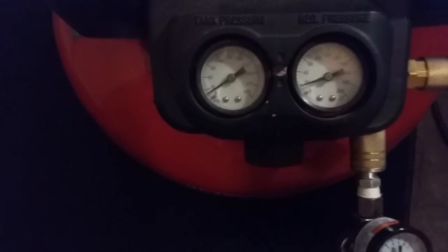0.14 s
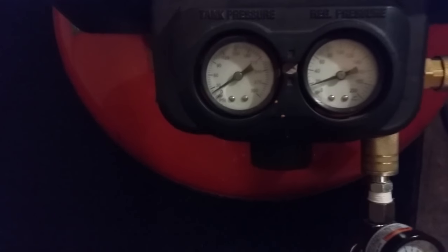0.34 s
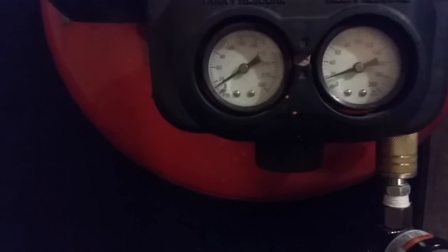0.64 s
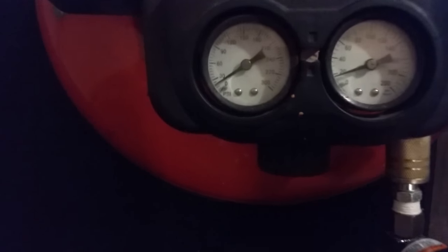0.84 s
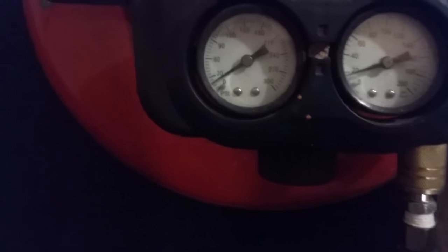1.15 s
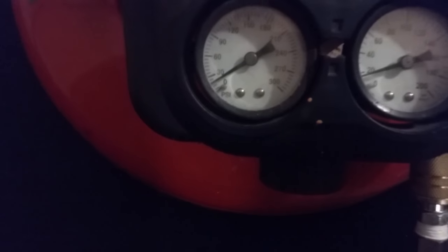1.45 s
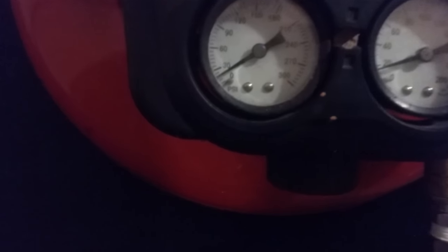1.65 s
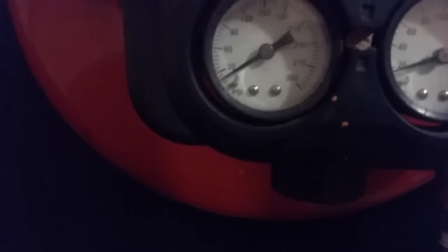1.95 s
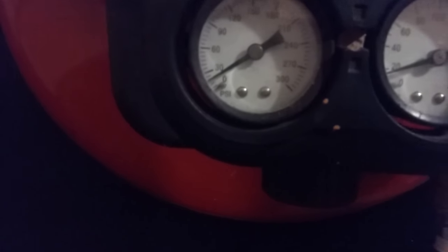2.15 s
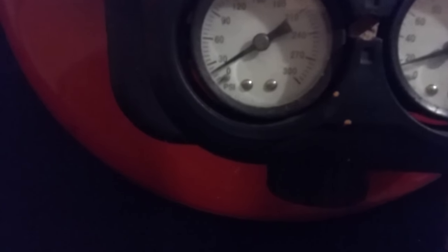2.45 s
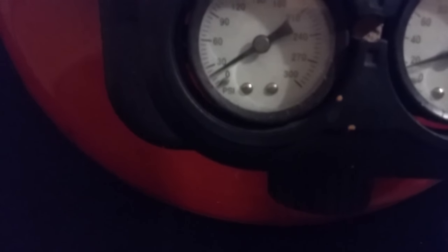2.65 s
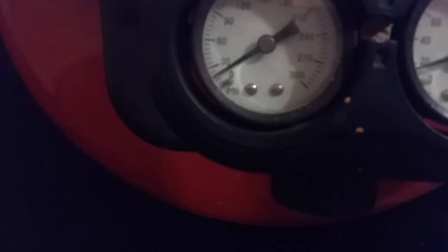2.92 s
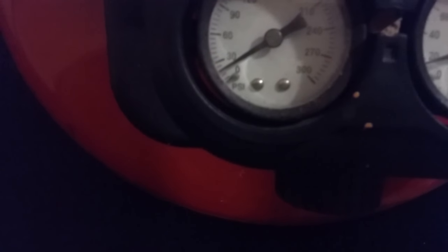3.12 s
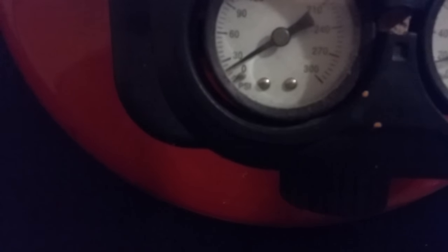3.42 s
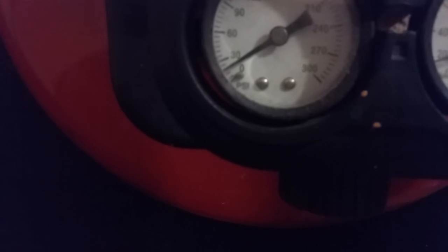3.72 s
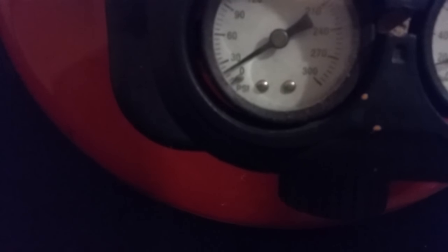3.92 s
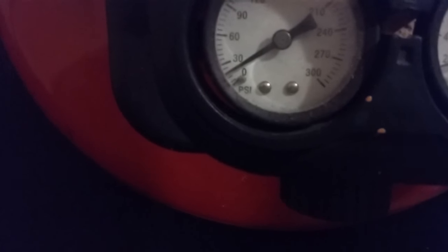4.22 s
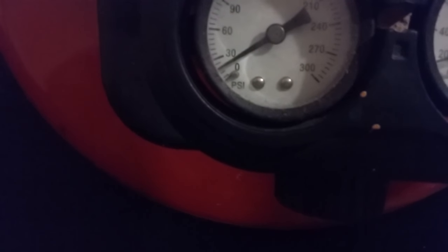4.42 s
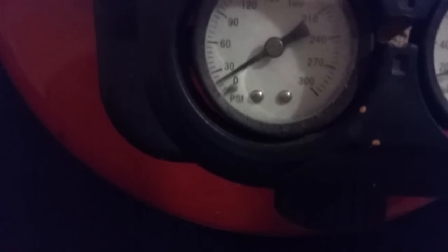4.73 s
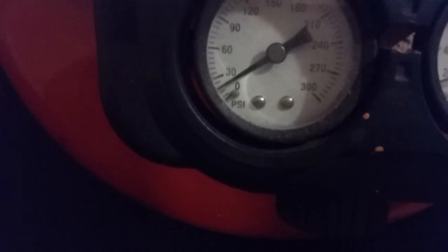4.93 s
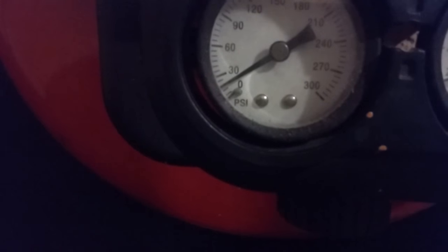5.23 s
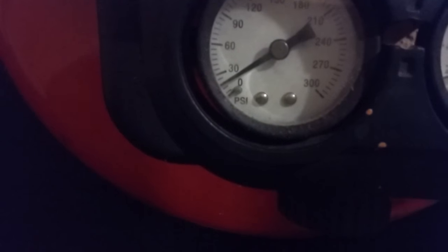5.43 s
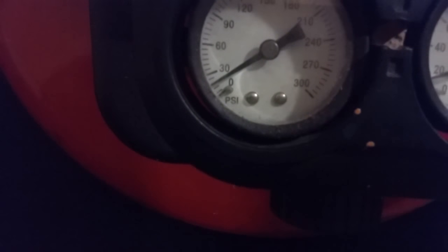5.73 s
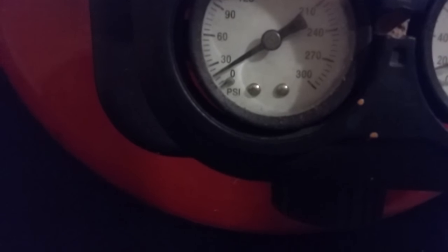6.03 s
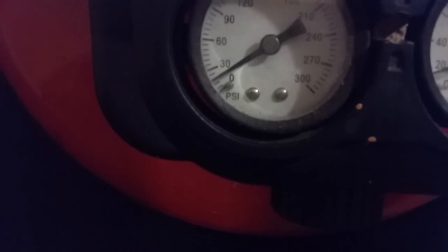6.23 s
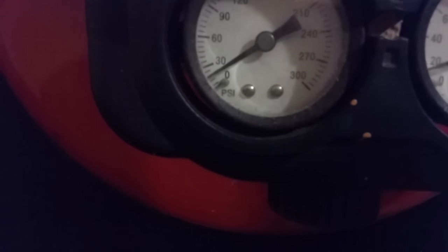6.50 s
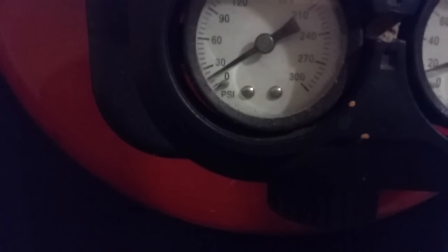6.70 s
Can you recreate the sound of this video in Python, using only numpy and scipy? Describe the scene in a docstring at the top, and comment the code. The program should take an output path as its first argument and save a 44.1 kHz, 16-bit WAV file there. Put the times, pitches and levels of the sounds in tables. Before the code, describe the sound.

Rapid puffs of compressed air hiss from a little engine, with dull knocks and faint squeaks in a small room.

```python
"""Little compressed-air engine

A single cylinder turns about six and a half times a second in a small room. On each turn the exhaust
port opens with a chirp and lets out a hissing puff; then the play in the linkage knocks the bench, and
the moving parts rub. The engine rocks in slow swells, which lift the knocks most and the puffs a little;
now and then the sliding parts run dry and squeak."""
import sys
import numpy as np
from scipy import signal
from scipy.fft import rfft, irfft, next_fast_len
from scipy.io import wavfile

SR = 44100
rng = np.random.default_rng(int(sys.argv[2]) if len(sys.argv) > 2 else 0)


def materialize(psi):
    """Save the field psi as 16-bit PCM at rate SR to the path in sys.argv[1].

    A 1-D psi becomes a single channel; in a 2-D psi each row is a channel.
    """
    bounded = np.clip(np.atleast_2d(psi).T, -1, 1)
    quanta = np.round(bounded * 32767).astype(np.int16)
    wavfile.write(sys.argv[1], SR, quanta)


N = 302692
TIME = np.arange(N) / SR

# how strongly the port sings near 6 kHz; the chirp follows it in part: t/s, level/dB over the jet
PORT_SINGING = [(0, 1), (.75, 3), (1.7, -2.5), (2.5, -15), (3.2, -3), (4, -13), (5, -11), (6.3, -24)]


def from_db(db):
    """Decibels to gain."""
    return 10 ** (np.asarray(db) / 20)


def rms_one(x):
    """Scale to unit power."""
    return x / np.sqrt(np.mean(x ** 2) + 1e-20)


def curve(rows, at):
    """Read a table of t/s, value at the given times."""
    return np.interp(at, *np.transpose(rows))


def lowpass(x, hz):
    """Soften with a two-pole low-pass."""
    return signal.sosfilt(signal.butter(2, hz, fs=SR, output="sos"), x)


def noise(spectrum):
    """Noise coloured by a table of f/Hz, level/dB; rms 1."""
    hz, db = np.transpose(spectrum)
    size = next_fast_len(N)
    bins = np.maximum(np.fft.rfftfreq(size, 1 / SR), 1)
    gain = from_db(np.interp(np.log(bins), np.log(hz), db))
    return rms_one(irfft(rfft(rng.standard_normal(size)) * gain)[:N])


def flutter(hz):
    """Smooth random wobble up to about the given rate; rms 1."""
    return rms_one(lowpass(rng.standard_normal(N), hz))


def whistle(hz, width):
    """A steady tone whose wandering phase smears it over a width in Hz; rms 1."""
    drift = signal.lfilter([.02], [1, -.98], rng.standard_normal(N))
    wander = np.sqrt(2 * np.pi * width / SR) * drift
    return np.sqrt(2) * np.sin(np.cumsum(2 * np.pi * hz / SR + wander))


def resonance(x, hz, width):
    """Two-pole band-pass with gain 1 at its peak."""
    r, w = np.exp(-np.pi * width / SR), 2 * np.pi * hz / SR
    return signal.lfilter(np.array([1, 0, -1]) * (1 - r * r) / 2, [1, -2 * r * np.cos(w), r * r], x)


def ring(force, hz, t60):
    """One struck mode: a unit click starts a dying sine of height 1."""
    r, w = np.exp(-np.log(1000) / (t60 * SR)), 2 * np.pi * hz / SR
    return signal.lfilter([0, np.sin(w)], [1, -2 * r * np.cos(w), r * r], force + 1e-18)


def clicks(times, force):
    """One click of the given force at each time."""
    at = np.round(times * SR).astype(int)
    inside = (at >= 0) & (at < N)
    return np.bincount(at[inside], force[inside], N)


def every_turn(starts, levels_db, shape):
    """Repeat an envelope (t/s after the port opens, level/dB) on each turn, at that turn's level."""
    lag, db = np.transpose(shape)
    power = np.zeros(N)
    for start, level in zip(starts, levels_db):
        a, b = np.searchsorted(TIME, [start + lag[0], start + lag[-1]])
        power[a:b] += from_db(level + np.interp(TIME[a:b] - start, lag, db)) ** 2
    return np.sqrt(power)


def turn_starts(first_s=-.0525):
    """The times at which the port opens, once a turn."""
    # the engine slows as the air pressure sinks: t/s, turn rate/Hz
    speed = [(0, 6.4785), (2.8, 6.4287), (4, 6.3384), (5.4, 6.306), (6.1, 6.163), (6.9, 6.356)]
    starts = [first_s]
    while starts[-1] < TIME[-1]:
        starts.append(starts[-1] + 1 / curve(speed, starts[-1]))
    return np.array(starts)


def swell(at, lull_db=-11):
    """The rocking rises and falls in an arch from lull to lull; in dB, 0 at the crest."""
    # lulls in the rocking: t/s
    lulls = [-.08, 1.66, 3.1, 4.6, 6.06, 7.7]
    arch = np.sin(np.pi * np.interp(at, lulls, np.arange(len(lulls)))) ** 2
    return 10 * np.log10(arch + (1 - arch) * from_db(lull_db) ** 2)


def chirps(starts, chirp_db):
    """The narrow slit whistles for a few milliseconds, and once more as the port widens."""
    # edge tones of the barely open port: f/Hz, width/Hz, level/dB
    edge_tones = [(5896, 71.3, 5), (5970, 570, -1), (11300, 560, -10), (12800, 120, -11)]
    double_blip = [(-.001, -22), (.0015, 1), (.005, -5), (.009, -5),
                   (.012, -8), (.0155, 5), (.02, -13), (.045, -40)]
    tone = rms_one(sum(from_db(db) * whistle(hz, width) for hz, width, db in edge_tones))
    return tone * every_turn(starts, chirp_db, double_blip)


def jet_noise(speed, fizz_db=2.5, edge_db=-2, spit_db=2, shimmer_db=3):
    """Turbulence coloured by the exhaust passage; the fastest flow (speed 1) is the brightest; rms 1."""
    # colour of the jet: f/Hz, level/dB
    colour = [(150, -9.5), (500, -13), (1000, -13.5), (1500, -9.5), (2400, -9.5), (3500, -12.5), (4700, -7),
              (5900, -1), (7600, -1.5), (9500, -6.5), (11200, -7), (13500, -9), (16000, -10.5)]
    # narrow resonances of the passage: f/Hz, width/Hz, level/dB over the jet
    passage = [(4600, 60, -6), (5730, 22, -8), (7170, 78, -5.5), (7450, 35, -0.5), (7900, 15, 1),
               (8030, 23, -8), (8530, 34, 4), (10900, 30, -8.5), (12800, 35, -7)]
    hiss = noise(colour)
    # each puff excites the resonances in a different mix
    shimmer = sum(from_db(db + shimmer_db * flutter(10)) * resonance(hiss, hz, width)
                  for hz, width, db in passage)
    swirl = noise(colour)
    singing = from_db(curve(PORT_SINGING, TIME)) * resonance(swirl, hz=6050, width=560)
    body_db = -12.5 + 2.5 * TIME   # the jet gains body as the listener moves
    body = from_db(body_db) * resonance(swirl, hz=3369, width=730)
    fizz = from_db(fizz_db + spit_db * flutter(20)) * resonance(noise(colour), hz=12000, width=4200)
    edge = from_db(edge_db + spit_db * flutter(3.01)) * resonance(swirl, hz=7700, width=470)
    return rms_one(hiss + shimmer + singing + body + speed * (fizz + edge))


def exhaust(starts, puff_db, leak_db, turbulence_db=0.5):
    """One hissing puff on each turn; between puffs a little air leaks past the closed port."""
    # air flow through the port: t/s after it opens, level/dB
    port_flow = [(-.03, -56), (-.012, -20), (-.002, -11.5), (.002, -4), (0.013, 2), (0.024, 3.5), (.036, 3),
                 (.055, -4), (.08, -10.5), (.1, -15.5), (.12, -51)]
    seepage = [(.05, 6), (.08, 6), (.105, 2.5), (.125, -0.5), (.14, 2), (.152, 0), (.165, -18)]
    flow = every_turn(starts, puff_db, port_flow)
    leak = every_turn(starts, leak_db, seepage)
    jet = jet_noise(speed=flow / flow.max())
    return jet * np.hypot(flow, leak) * from_db(turbulence_db * flutter(460))


def knocks(starts, knock_db, blow_db=-4, rattle_db=-7, shudder_db=-9.3, scatter_db=1, scatter_s=.00037):
    """Soft contacts of the linkage and their fine rattle ring the bench, which shudders on after them."""
    # contacts of the loose linkage: t/s after the port opens, level/dB
    contacts = [(.053, -4.5), (0.057, -2.5), (0.072, -3), (.081, -2.5), (0.0873, -7.5), (.1, -2)]
    # modes of the bench and engine frame: f/Hz, level/dB, t60/s
    bench_modes = [(75.3, -15, 0.26), (118, 0.5, 0.12), (188.9, -2.8, 0.18), (222.5, -6, 0.11),
                   (277.8, -5.5, .17), (354, -5.5, 0.074), (369.6, -7.5, 0.12), (409, -21.5, 0.078),
                   (478.6, -11.5, 0.076), (770, -10, 0.045)]
    # colour of the dull shudder: f/Hz, level/dB
    shudder_colour = [(25, -45), (42, -20), (64, 8), (90, -4.5), (125, -4), (165, -10.5), (260, -12.5),
                      (450, -24), (900, -20), (2000, -33)]
    rattle_colour = [(60, 4), (130, -10), (200, 1.5), (900, -1.5), (3000, -32), (9000, -50)]
    rattle_shape = [(.047, -57), (.052, -37), (.075, -38.5), (.095, -39.5), (.13, -45.5), (.18, -57)]
    shudder_shape = [(.05, -26), (.06, 8.5), (.09, 2), (.12, -0.5), (.2, -0.5), (.26, 0.5)]
    lag, db = np.transpose(contacts)
    chance = rng.standard_normal((len(starts), 2, len(lag)))
    times = starts[:, None] + lag + scatter_s * chance[:, 0]
    force = from_db(knock_db[:, None] + blow_db + db + scatter_db * chance[:, 1])
    rattle = noise(rattle_colour) * every_turn(starts, knock_db + rattle_db, rattle_shape)
    push = lowpass(clicks(times, force) + rattle, hz=1100)   # soft contacts dull the attack
    bench = sum(from_db(level) * ring(push, hz, t60) for hz, level, t60 in bench_modes)
    shudder = noise(shudder_colour) * every_turn(starts, knock_db + shudder_db, shudder_shape)
    return bench + shudder


def thuds(starts, thud_db, lag_s=.078, softness_hz=260):
    """The piston lands one soft, heavy blow on each turn as the engine rocks on the bench."""
    # deep, heavily damped modes of the bench: f/Hz, level/dB, t60/s
    deep_modes = [(75.7, 1, 0.15), (118, 0.5, 0.029)]
    force = lowpass(clicks(starts + lag_s, from_db(thud_db)), softness_hz)
    return sum(from_db(db) * ring(force, hz, t60) for hz, db, t60 in deep_modes)


def rubbing(starts, rub_db, grain_db=2.37):
    """Metal slides on metal with a fine, uneven grain."""
    # colour of the rubbing: f/Hz, level/dB
    colour = [(200, 2), (550, -2.5), (1100, -9), (1420, 2.5), (1650, -2), (1900, 0), (2200, -3.5),
              (2750, -18), (4500, -13.5), (9000, -17.5), (16000, -43)]
    # friction through a turn: t/s after the port opens, level/dB
    stroke = [(.02, -41), (.06, 6.5), (.085, 1.5), (.11, 1), (0.141, 0.5), (0.164, 6), (0.189, -11.5)]
    return noise(colour) * every_turn(starts, rub_db, stroke) * from_db(grain_db * flutter(160))


def squeaks(starts, note_db=-1, scrape_db=-2, rasp_db=5, fade_s=0.016):
    """Stick and slip: a rasping note and a broad scrape follow the stroke while the parts run dry."""
    # spells of dry running: start t/s, end t/s, level/dB
    spells = [(.42, .85, -47.5), (1.17, 1.48, -50.5), (2.55, 2.76, -51), (3.43, 3.52, -46.5),
              (3.77, 3.98, -48), (4.41, 4.6, -49), (5.38, 5.57, -48), (5.78, 5.99, -50), (6.34, 6.39, -52),
              (6.66, 6.86, -47.5)]
    # pitch of the squeak: t/s, f/Hz
    pitch = [(0, 1960), (1.4, 1949), (2.5, 2190), (4, 2037), (6.8, 2040)]
    # colour of the scrape: f/Hz, level/dB
    scrape_colour = [(200, -6), (700, -2), (1500, 4), (2400, 0.5), (3000, -6.5), (5000, 1), (9000, -8),
                     (16000, -15)]
    # the parts catch most as the stroke turns round: t/s after the port opens, level/dB
    stroke = [(0, -4), (.012, 0), (.045, -17), (.07, -1.5), (0.123, -6), (0.142, 2), (.158, -8.5)]
    dryness = sum(from_db(db) * np.interp(TIME, [start - fade_s, start, end, end + fade_s], [0, 1, 1, 0])
                  for start, end, db in spells)
    note = rms_one(whistle(curve(pitch, TIME), width=400) * from_db(rasp_db * flutter(160)))
    friction = from_db(note_db) * note + from_db(scrape_db) * noise(scrape_colour)
    return friction * dryness * every_turn(starts, np.zeros(len(starts)), stroke)


def frame(x, ring_db=-4):
    """The metal frame rings with whatever excites it."""
    return x + from_db(ring_db) * resonance(x, hz=1472, width=70)


def room(x, wet_db=-8.5, t60=0.17, first_s=0.0037):
    """Dense reflections from close walls, blended in at equal overall power."""
    t = TIME[:SR // 2]
    tail = rng.standard_normal(len(t)) * np.exp(-np.log(1000) * t / t60) * (t > first_s)
    reflections = signal.fftconvolve(x, tail / np.linalg.norm(tail))[:N]
    wet = from_db(wet_db)
    return (x + wet * reflections) / np.hypot(1, wet)


def room_tone(level_db=-59):
    """A faint, low bed of noise fills the room."""
    # colour of the quiet room: f/Hz, level/dB
    colour = [(20, -45), (40, -28), (62, 2), (120, 12), (300, -22), (800, -18), (2000, -13), (4000, -45),
              (16000, -64)]
    return from_db(level_db) * noise(colour)


def scene():
    """Air, metal and bench keep time with the turns and ride the slow swell, over the room tone."""
    starts = turn_starts()
    rocking = swell(starts)
    late_rocking = swell(starts - 0.19)   # chirps, puffs and thuds swell a little after the knocks
    sag_db = -0.1744 * starts   # puffs and knocks weaken as the engine slows
    singing_db = curve(PORT_SINGING, starts)
    scatter = rng.standard_normal((len(starts), 4)).T
    # levels turn by turn: each sound has a base level and follows its own share of the swell
    chirp_db = -38.5 + 0.59 * late_rocking + 0.44 * (singing_db - singing_db.mean())
    puff_db = -34.5 + 0.19 * late_rocking + 0.69 * scatter[0] + sag_db
    knock_db = -39.5 + 0.87 * rocking + 0.48 * scatter[1] + sag_db
    thud_db = -43 + 0.33 * late_rocking
    rub_db = -54 + 0.52 * rocking + 1.76 * scatter[2]
    leak_db = -59 + 0.5 * rocking - 1.2 * scatter[3]
    air = exhaust(starts, puff_db, leak_db) + chirps(starts, chirp_db)
    metal = rubbing(starts, rub_db) + squeaks(starts)
    bench = knocks(starts, knock_db) + thuds(starts, thud_db)
    engine = room(frame(air + metal)) + bench
    return (engine + room_tone())[None]


def record(dry, low_cut_hz=50, high_cut_hz=15900):
    """The microphone drops the deep bass; the very top is cut steeply."""
    thin = signal.sosfilt(signal.butter(6, low_cut_hz, "high", fs=SR, output="sos"), dry)
    return signal.sosfilt(signal.ellip(12, .1, 80, high_cut_hz, fs=SR, output="sos"), thin)


dry = scene()
out = record(dry)
materialize(out)
```